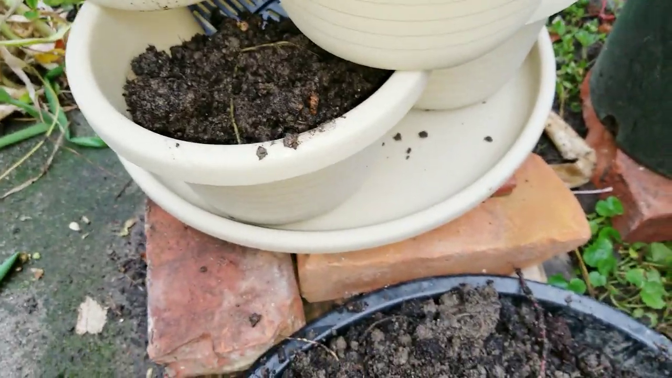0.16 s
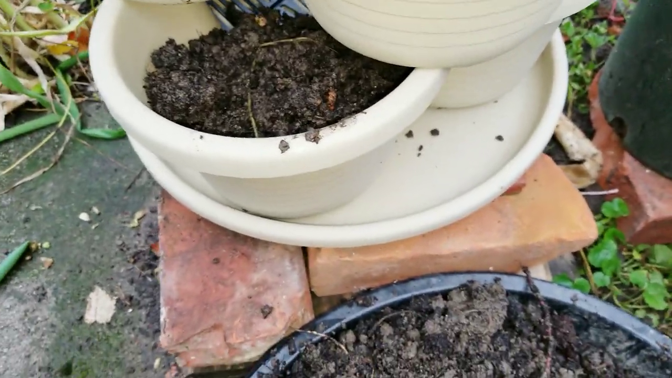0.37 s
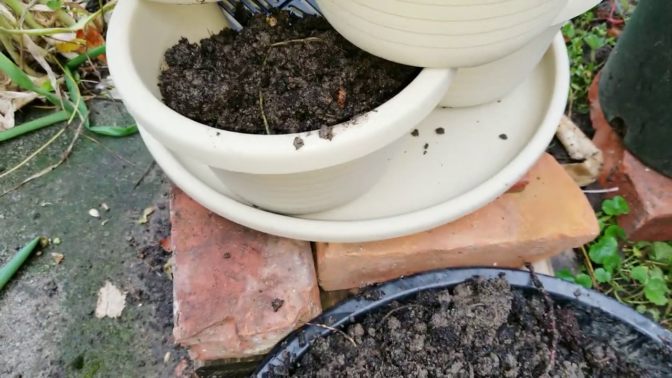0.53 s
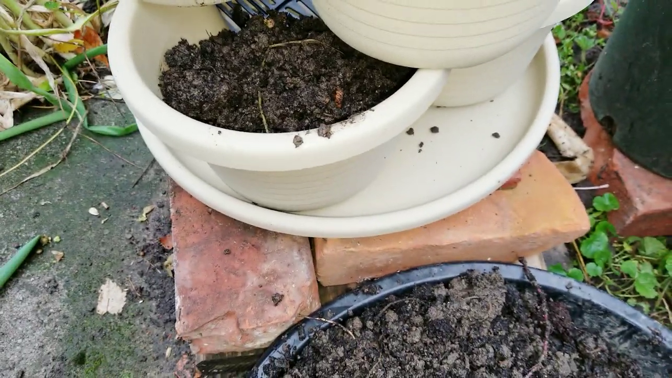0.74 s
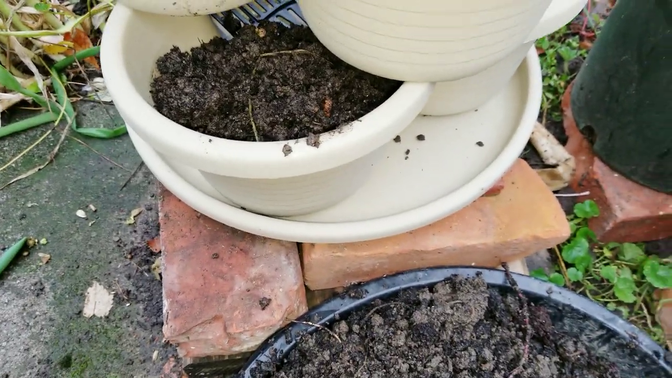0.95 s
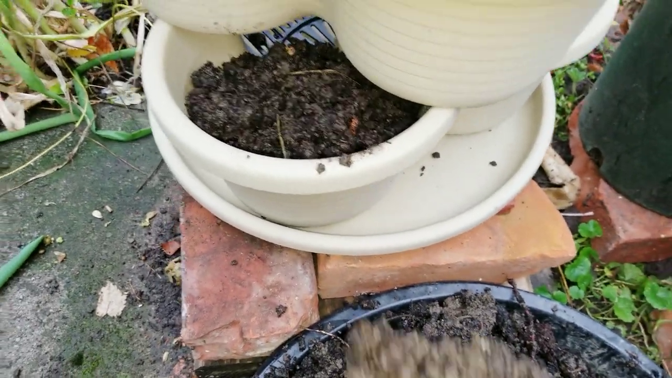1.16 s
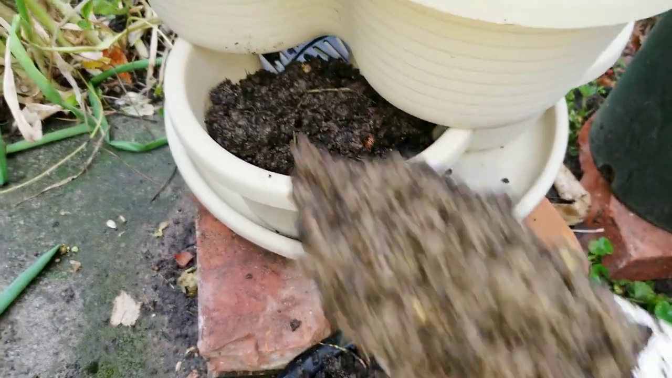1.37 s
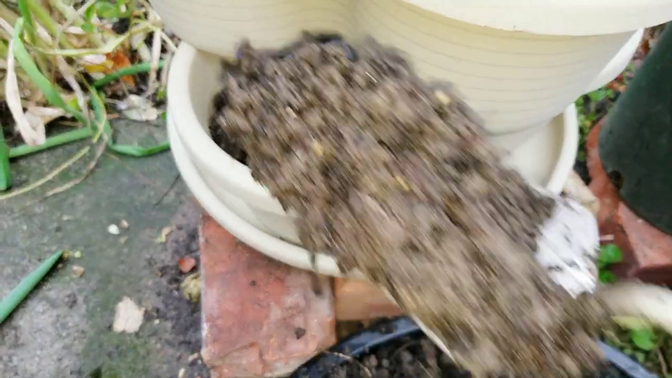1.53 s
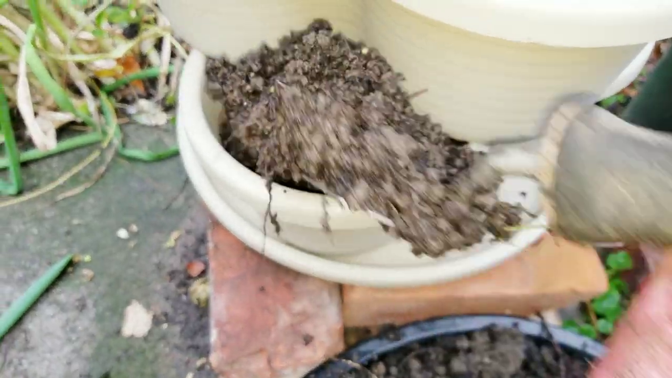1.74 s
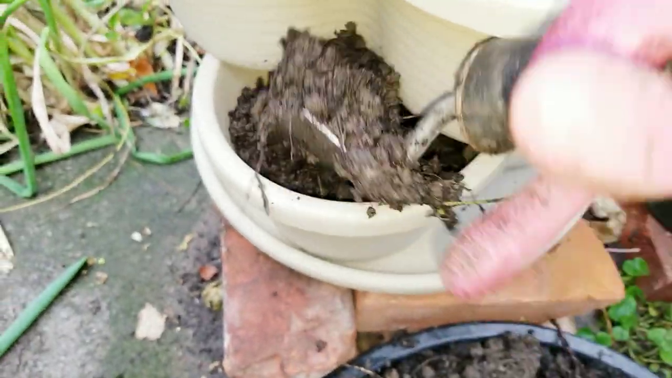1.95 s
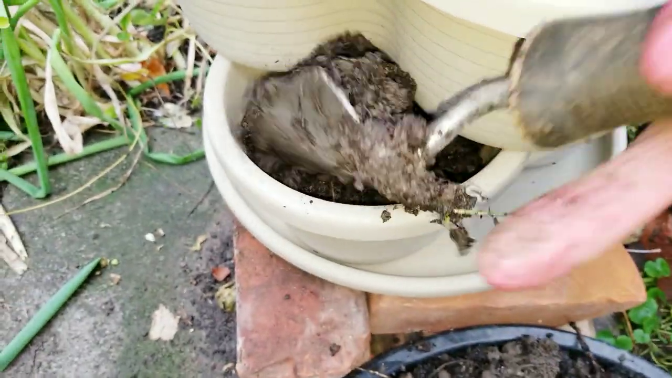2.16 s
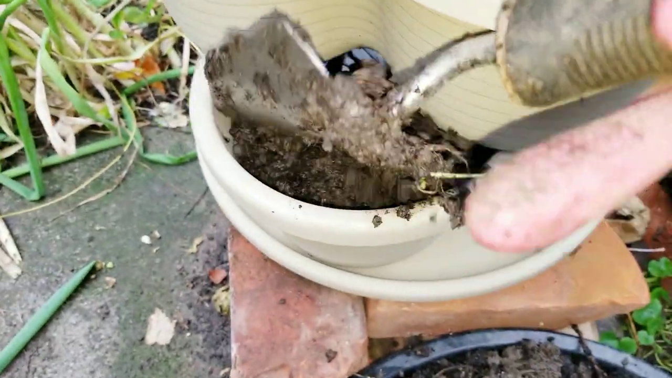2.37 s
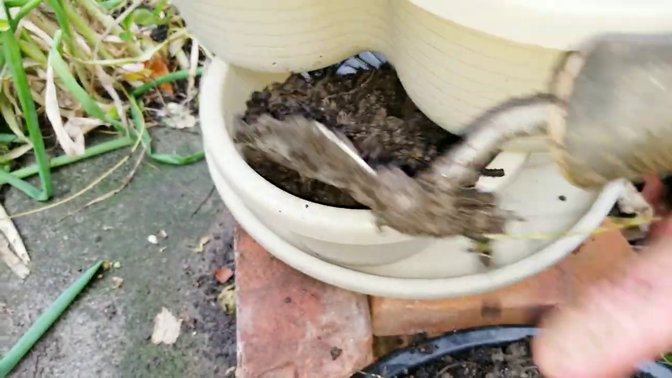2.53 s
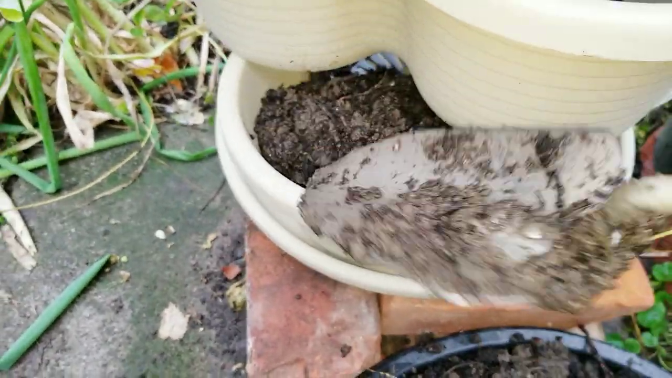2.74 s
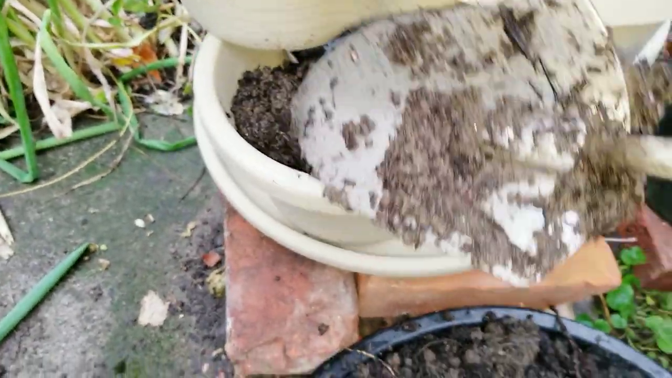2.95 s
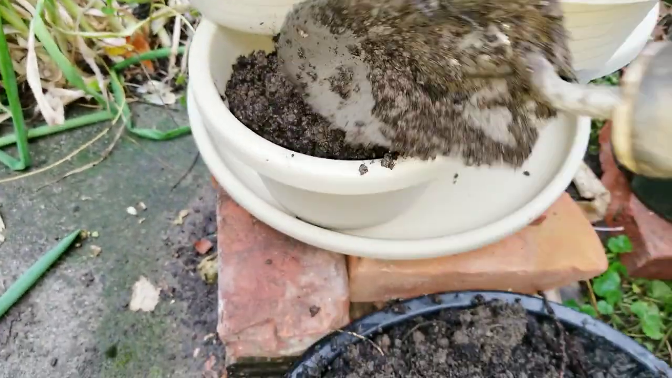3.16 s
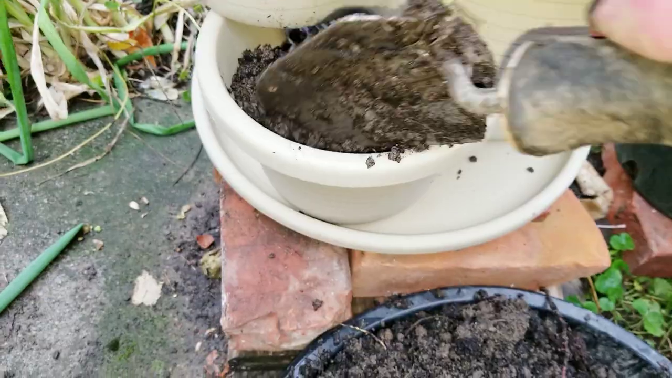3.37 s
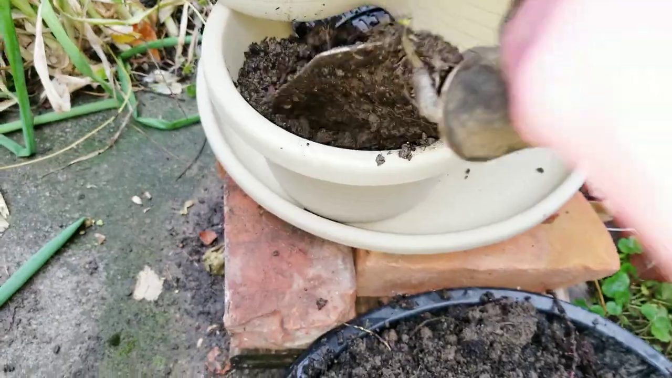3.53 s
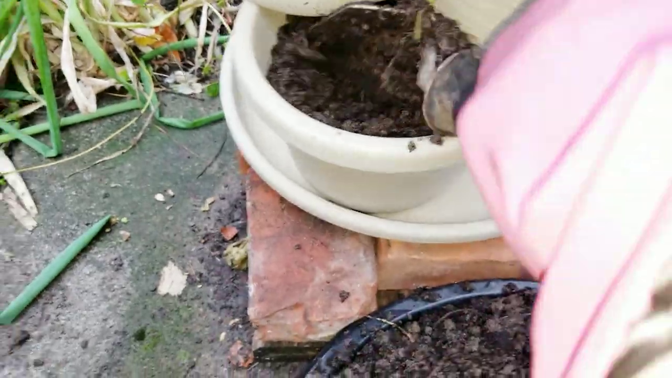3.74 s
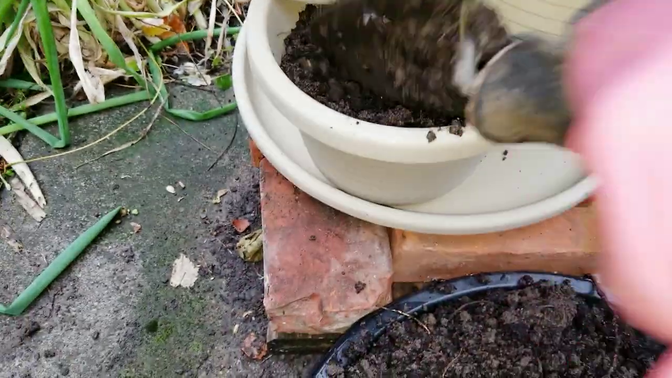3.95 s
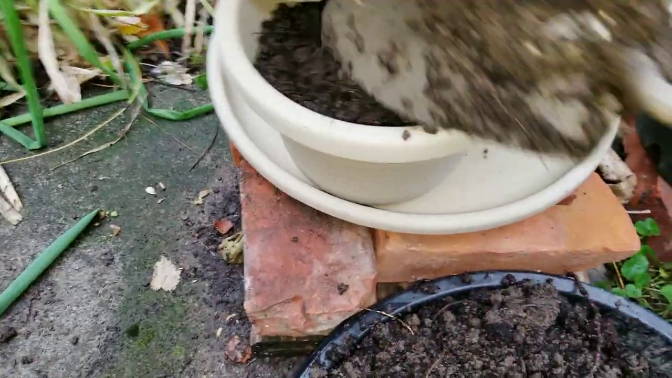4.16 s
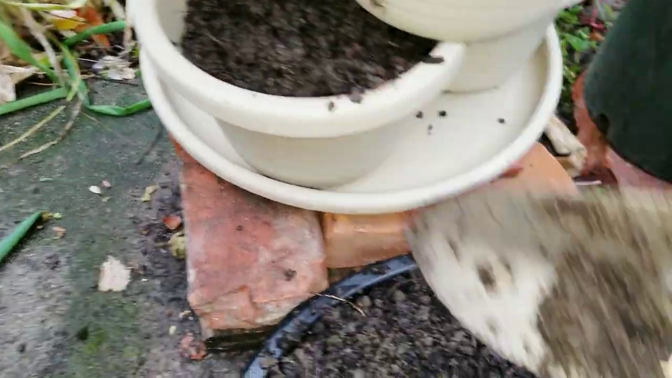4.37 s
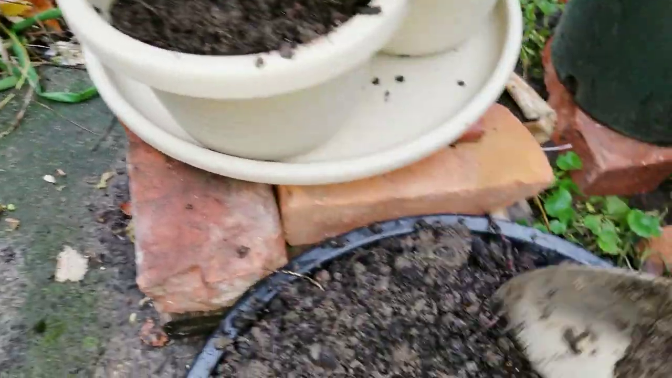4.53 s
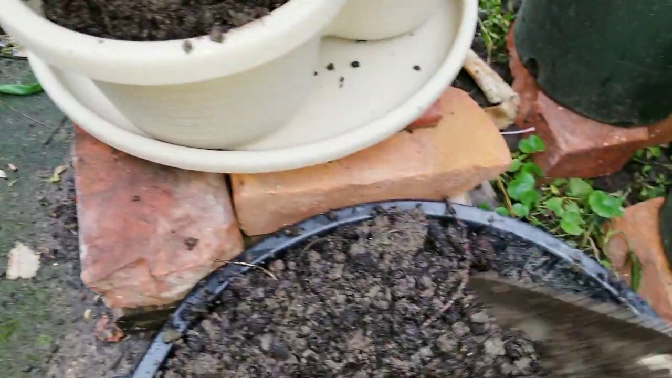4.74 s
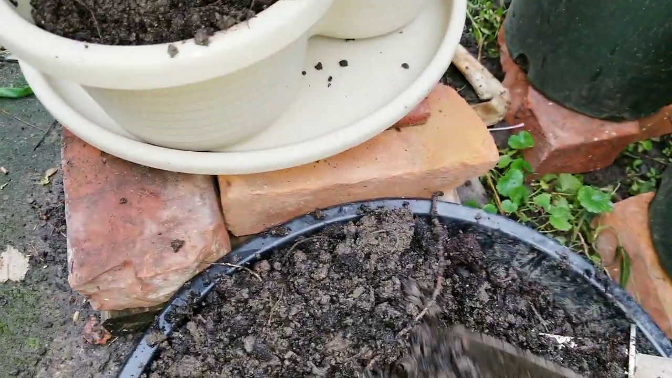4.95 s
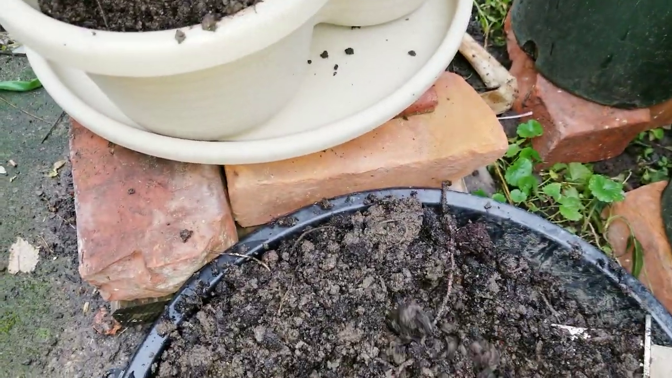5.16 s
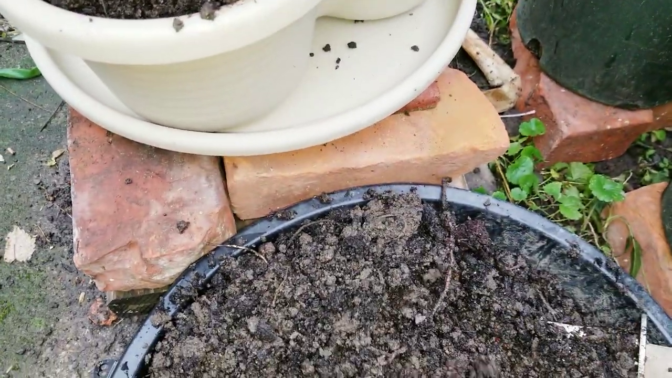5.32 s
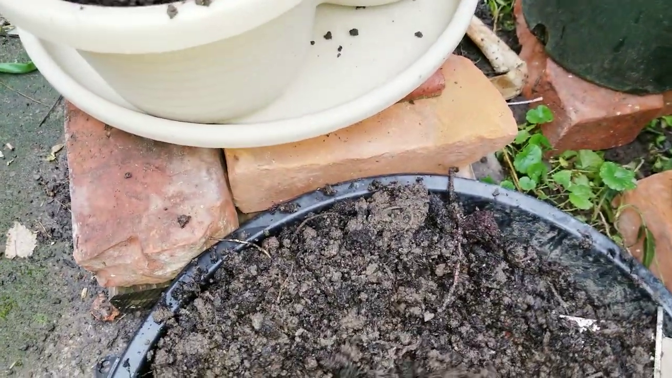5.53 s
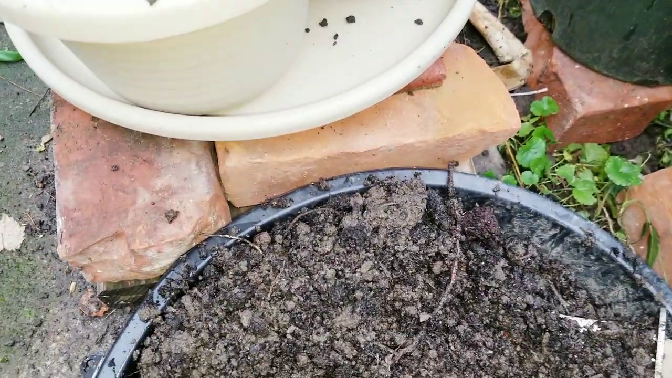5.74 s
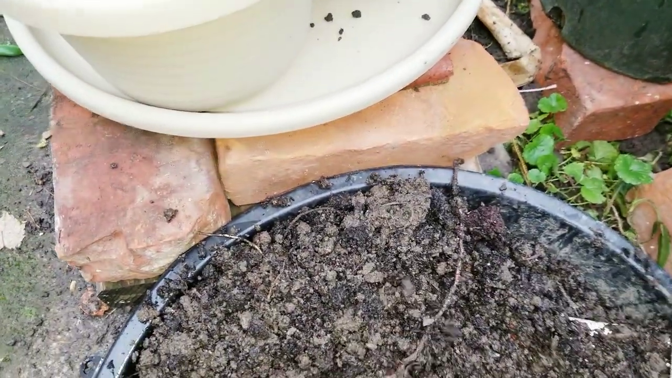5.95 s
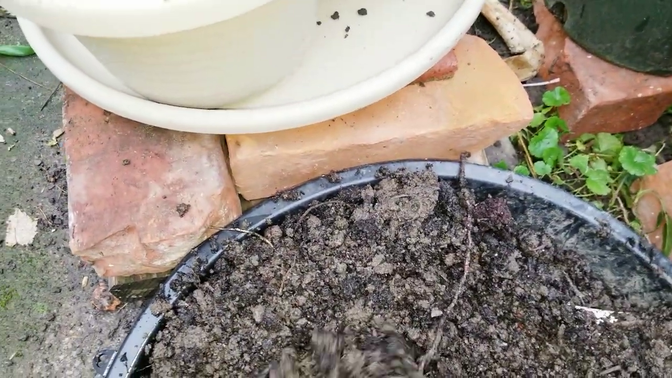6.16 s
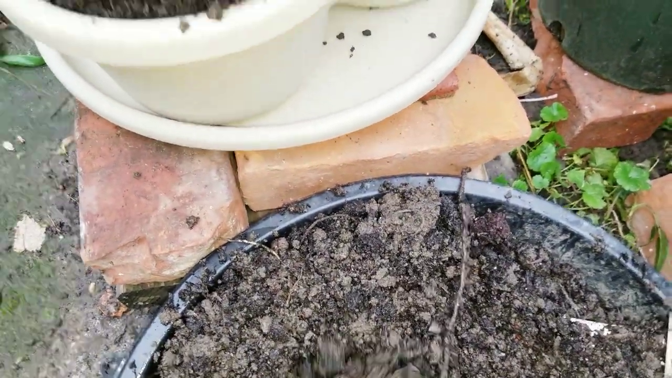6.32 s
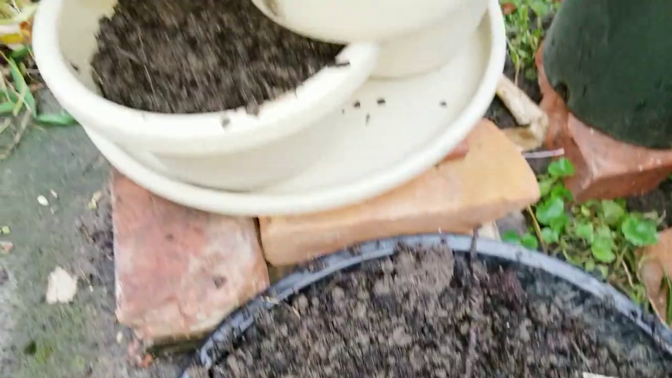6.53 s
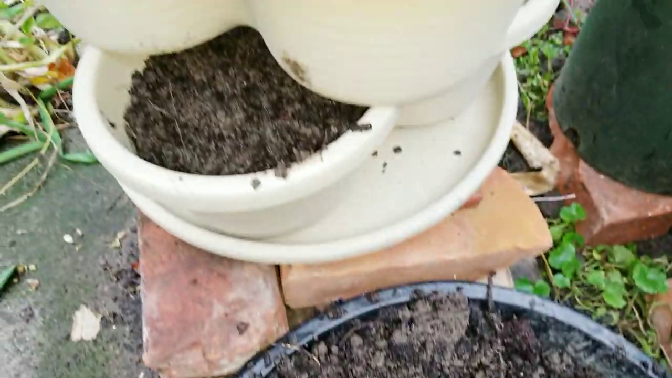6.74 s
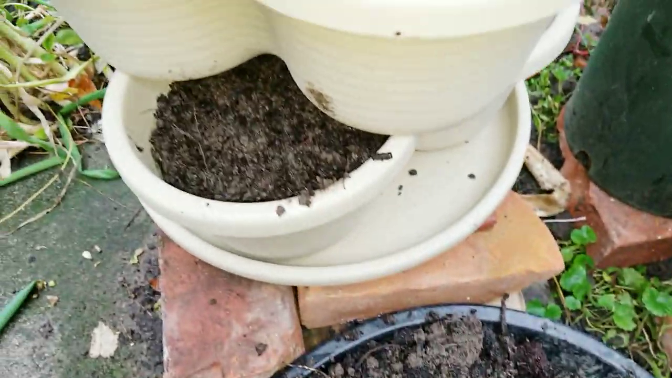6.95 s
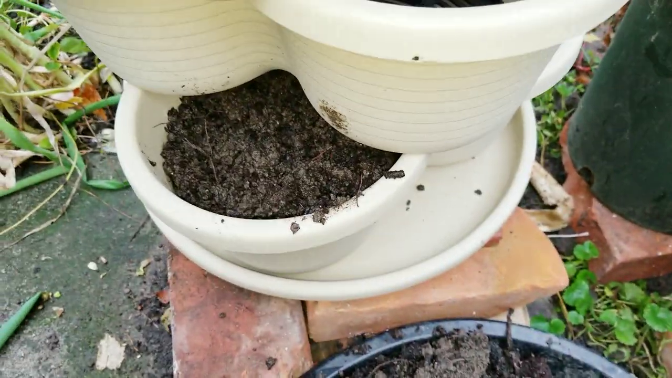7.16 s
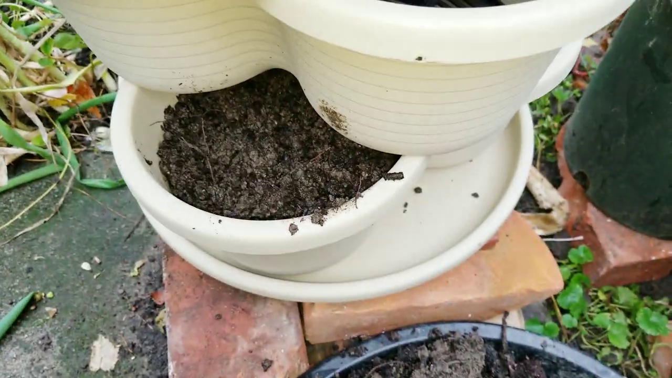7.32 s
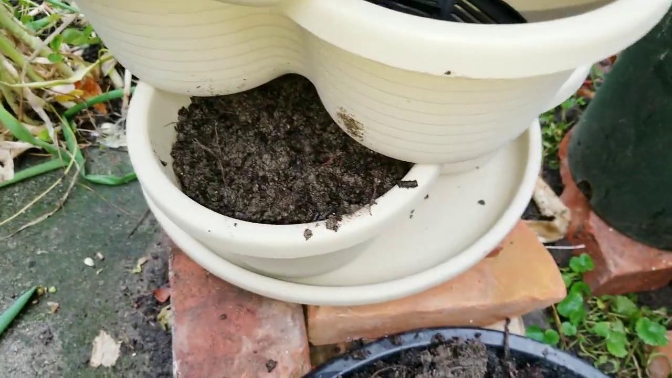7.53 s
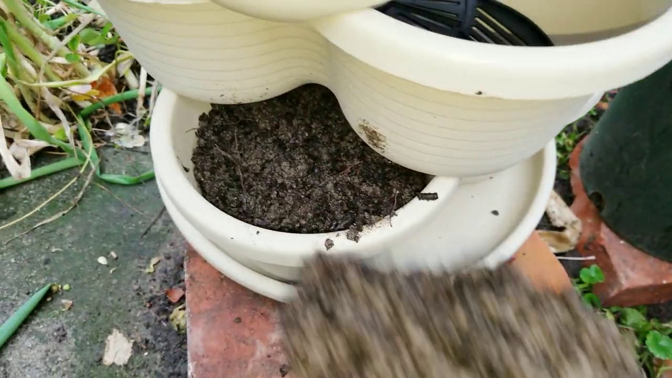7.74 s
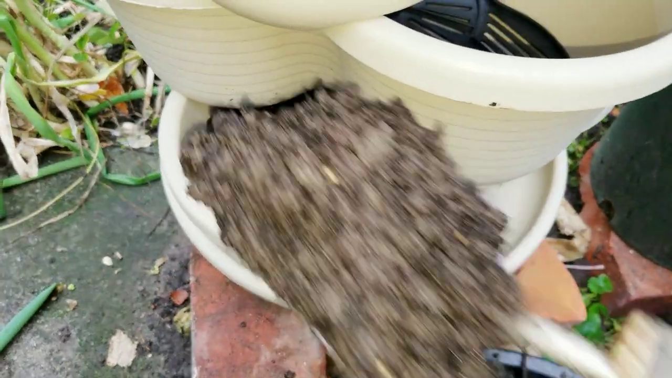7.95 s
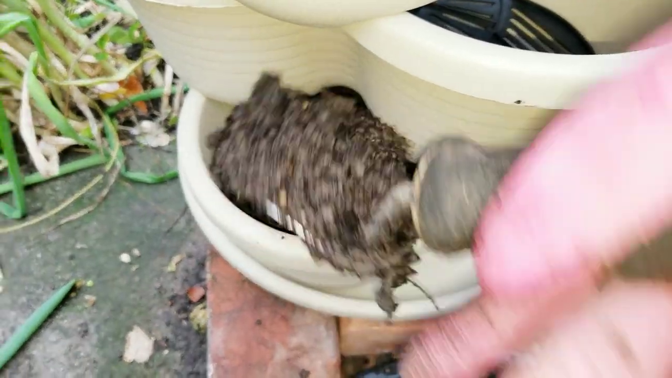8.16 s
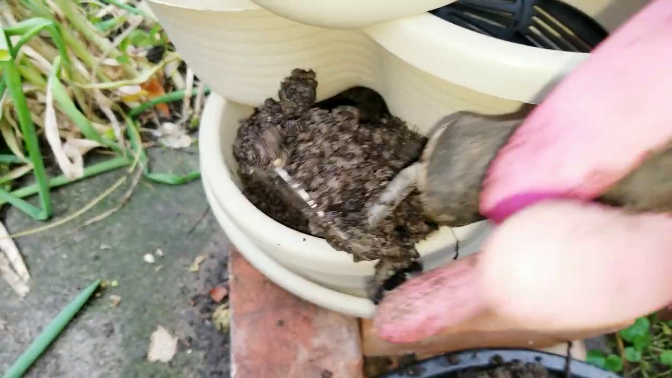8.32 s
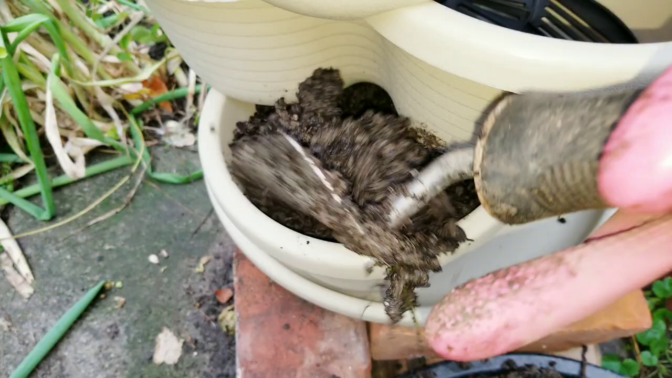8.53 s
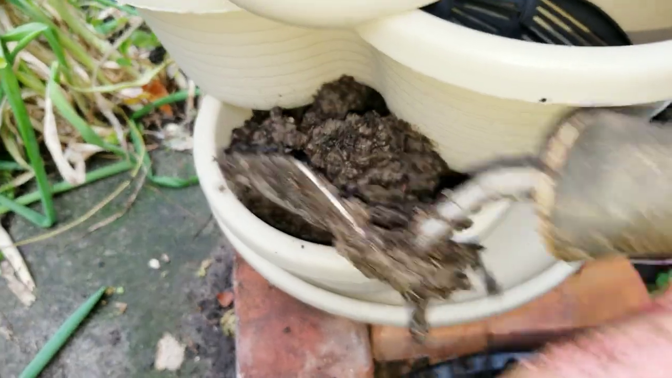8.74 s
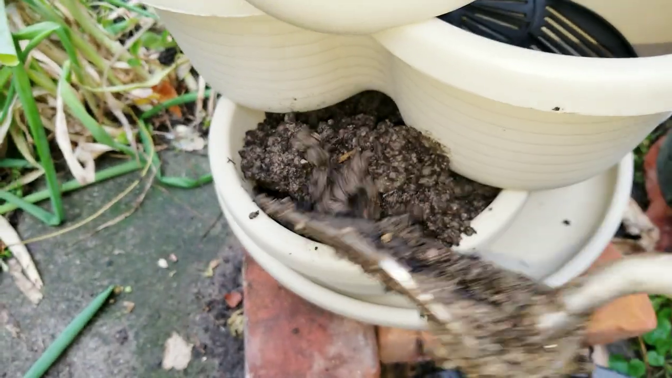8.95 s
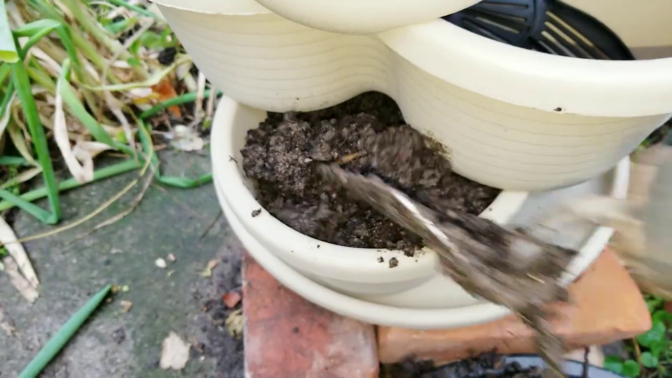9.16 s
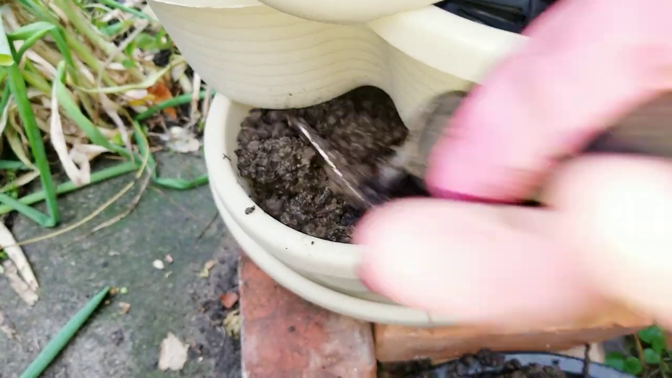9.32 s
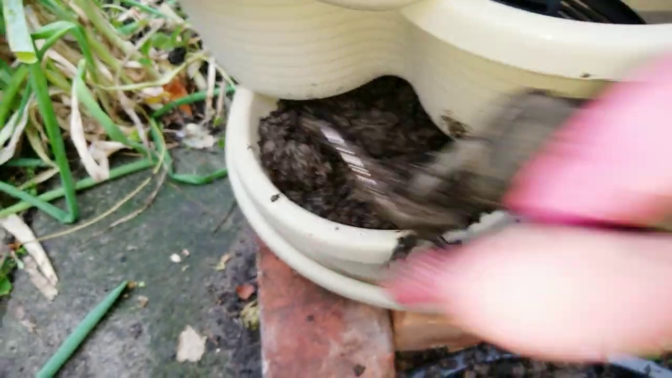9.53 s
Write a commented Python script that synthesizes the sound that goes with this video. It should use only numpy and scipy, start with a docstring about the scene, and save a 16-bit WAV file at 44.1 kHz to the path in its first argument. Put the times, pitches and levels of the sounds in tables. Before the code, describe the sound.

A metal trowel tips damp soil into a hollow plastic planter with knocks and gritty scrapes, digs again, then tips more, over faint outdoor rumble.

```python
"""Outdoors, a steel hand trowel digs damp soil from a tub, tips it into a plastic planter and pats it down.
Grit cracks excite the blade's soil-damped modes; blows of blade and clods excite the hollow planter wall.
Sliding soil and short drags are ragged noise forces through the same two bodies; small hard clicks ring
three modes of their own. Far traffic rumbles under the faint hiss of two microphones a few centimetres apart."""
import sys
import numpy as np
from scipy import signal
from scipy.fft import rfft, irfft, next_fast_len
from scipy.io import wavfile
from scipy.ndimage import uniform_filter1d, map_coordinates

SR = 44100
rng = np.random.default_rng(int(sys.argv[2]) if len(sys.argv) > 2 else 0)


def store_wav(level_fs):
    """Save 16-bit WAV to argv[1]."""
    pcm = np.round(np.clip(np.atleast_2d(level_fs), -1, 1) * 32767)
    wavfile.write(sys.argv[1], SR, pcm.T.astype(np.int16))


N = 427329

# modes of the soil-damped steel blade: (frequency [Hz], width [Hz], relative level [dB])
BLADE = [(1234, 1300, -16.5), (1680, 535, 4), (2314, 1340, -4), (2780, 330, 2.5), (3600, 610, -12),
         (4460, 430, 3), (5480, 1630, -3.5), (6530, 1200, 4), (8050, 1100, -1), (10160, 1300, 2.5),
         (12560, 1930, -1), (15100, 1450, 4)]
# where the trowel works: (time [s], lag of left behind right [s], left-right level [dB])
PLACE = [(0, 0.000049, 0), (2.2, 0.000075, 1.5), (4.4, 0.00011, 1.5), (4.6, 0.00023, -1.5),
         (6.1, 0.00016, -5.5), (7.4, 0.000062, -4), (8.6, 0.000085, 1.5), (9.69, 0.00012, -1.5)]
BODY_HZ, TREBLE_HZ = 2810, 8500  # where the grit's three colours meet


def amp(db):
    """Level in decibels to amplitude ratio."""
    return 10 ** (np.asarray(db) / 20)


def unit(x):
    """Normalisation to an rms of 1."""
    return x / np.sqrt(np.mean(x ** 2) + 1e-20)


def along(points, hz):
    """Linear interpolation of (frequency [Hz], value) points on a logarithmic frequency axis."""
    f, value = np.transpose(points)
    return np.interp(np.log(hz + 1), np.log(f + 1), value)


def curves(rows):
    """Linear interpolation in time: one value per sample for each column after the time."""
    s, *columns = np.transpose(rows)
    return [np.interp(np.arange(N) / SR, s, column) for column in columns]


def wobble(rate):
    """Band-limited random fluctuation: a smooth curve through random knots, rate of them a second."""
    knots = rng.standard_normal(int(N * rate / SR) + 4)
    return map_coordinates(knots, [np.arange(N) * rate / SR])


def filtered(x, response):
    """Linear filtering: the spectrum of x times a complex response of frequency."""
    m = next_fast_len(N + SR // 2)
    hz = np.fft.rfftfreq(m, 1 / SR)
    return irfft(rfft(x, m) * response(hz), m)[..., :N]


def coloured(x, gain):
    """Power-preserving filtering: the response is scaled so that white noise keeps its power."""
    return filtered(x, lambda hz: gain(hz) / np.sqrt(np.mean(np.abs(gain(hz)) ** 2)))


def pair(n, shared):
    """Partial coherence: noise at two microphones, a share of its power common to both."""
    noise, shared = rng.standard_normal((3, n)), np.clip(shared, 0, 1)
    return np.sqrt(shared) * noise[0] + np.sqrt(1 - shared) * noise[1:]


def left_right(pan):
    """Level difference between the microphones [dB], split evenly between left and right."""
    return np.array([[pan / 2], [-pan / 2]])


def pan_at(s):
    """Level difference [dB] due to the trowel's place at these times."""
    t, _, pan = np.transpose(PLACE)
    return np.interp(s, t, pan)


def modes(table, hz):
    """Modal superposition: a body's response to a force as a sum of resonances of alternating sign."""
    return sum((-1) ** k * amp(db) * 1j * hz * width / (centre * centre - hz * hz + 1j * hz * width)
               for k, (centre, width, db) in enumerate(table))


def bursts(times, dbs, pans, holds, t60s, rise, snap, shared):
    """Contact forces: noise that rises, holds and decays, with a single push of size snap at each start."""
    out, t = np.zeros((2, N + SR)), np.arange(SR // 5) / SR
    for s, db, pan, hold, t60, up in np.broadcast(times, dbs, pans, holds, t60s, rise):
        decay = amp(-60 * np.maximum(t - hold, 0) / np.clip(t60, .004, .2))
        envelope = decay * (1 - np.exp(-t / up))
        push = snap * rng.choice([-1, 1]) * np.exp(-t / up)
        force = envelope * pair(len(t), shared) + push
        out[:, round(s * SR):][:, :len(t)] += amp(db + left_right(pan)) * force
    return out[:, :N]


def notes(times, dbs, pans, t60s, pitches):
    """Free damped vibration: one decaying sine per contact, at the pitch given for it."""
    out, t = np.zeros((2, N + SR)), np.arange(SR // 10) / SR
    for s, db, pan, t60, hz in np.broadcast(times, dbs, pans, t60s, pitches):
        envelope = amp(db + left_right(pan) - 60 * t / t60)
        out[:, round(s * SR):][:, :len(t)] += envelope * np.sin(2 * np.pi * hz * t)
    return out[:, :N]


def clumps(slow_db, fast_db):
    """Stick-slip granular flow: soil slips in lumps and grains, a ragged gain of rms 1."""
    return unit(amp(slow_db * wobble(60) + fast_db * wobble(450)))


def planter(hz):
    """Modal response of the hollow plastic wall; a small pot is an inefficient radiator of bass."""
    # wall modes: (frequency [Hz], width [Hz], relative level [dB])
    wall_modes = [(135, 52, 1), (342.7, 11.5, -1.5), (412.5, 62, -1), (662, 86, -0.5), (767.5, 87, 2),
                  (1084, 444, -3.5), (1286, 230, -4), (1665, 310, -15), (2250, 2650, -25), (3340, 810, -19)]
    radiation = (1j * hz / 200 / (1 + 1j * hz / 200)) ** 2
    return modes(wall_modes, hz) * radiation


def grit(force, body_db, treble_db):
    """Size-dependent excitation: big crumbs ring the blade's low modes, hard sand its high ones.

    force(dB) makes the excitation of each colour."""
    def low(hz):
        return 1 / np.sqrt(1 + (hz / BODY_HZ) ** 6) / np.sqrt(1 + (1100 / (hz + 1)) ** 6)

    def high(hz):
        return 1 / np.sqrt(1 + (TREBLE_HZ / (hz + 1)) ** 6)

    def mid(hz):
        return np.sqrt(1 - high(hz) ** 2) / np.sqrt(1 + (BODY_HZ / (hz + 1)) ** 6)

    # a flat part 7 dB down adds to the modes
    return sum(coloured(force(db), lambda hz: (modes(BLADE, hz) + amp(-7)) * band(hz))
               for db, band in [(body_db, low), (0, mid), (treble_db, high)])


def banded(x, depth_db):
    """Contact-dependent modal coupling: as the contact moves, different bands come forward for some 30 ms."""
    z = signal.stft(x, nperseg=256)[2]
    field = rng.standard_normal(z.shape[1:])
    field = uniform_filter1d(uniform_filter1d(field, size=3, axis=0), size=10, axis=1)
    gain = unit(amp(depth_db * unit(field)))
    return signal.istft(z * gain, nperseg=256)[1][:, :N]


def town():
    """Partial coherence: traffic rumble and moving air partly alike on both sides, and microphone hiss."""
    # course of the rumble: (time [s], level before a common gain [dB], left-right level [dB])
    course = [(0.0, -48.5, 0), (1.86, -49, -1), (2.29, -47.5, -1.5), (3.34, -49, 0), (3.72, -48, -3),
              (4.1, -50, -0.5), (5.99, -48.5, 0), (6.83, -45.5, 2.5), (7.23, -49, -0.5), (8.72, -46.5, -1),
              (9.07, -46.5, 0.5), (9.69, -49, -1.5)]
    # rumble spectrum: (frequency [Hz], relative density [dB per Hz])
    rumble_spectrum = [(12, -47), (20, -31), (30, -15), (48, 1), (121, -5.5), (281, -17), (330, -19.5),
                       (363, -23), (532, -34), (644, -39), (900, -35.5), (1170, -47), (1980, -120)]
    # hiss spectrum: (frequency [Hz], relative density [dB per Hz])
    hiss_spectrum = [(290, -7), (500, -4), (538, -2.5), (651, -8.5), (1130, -11), (1680, -14), (2610, -13),
                     (3210, -22), (3770, -18.5), (8930, -25), (15100, -16.5), (15800, -35), (16500, -25)]
    # likeness of the two sides: (frequency [Hz], correlation [-1 to 1])
    likeness = [(30, .7), (80, .75), (160, .85), (320, .65), (640, .2)]

    def mid_side(hz):
        turn = np.arccos(np.clip(along(likeness, hz), -1, 1)) / 2  # mid less side power is the correlation
        return amp(along(rumble_spectrum, hz)) * [np.cos(turn), np.sin(turn)]

    rumble_db, pan = curves(course)
    mid, side = filtered(rng.standard_normal((2, N)), mid_side)
    level_db = rumble_db + 1.68 + 0.3 * wobble(3.27) + np.array([pan, -pan]) / 2
    rumble = amp(level_db) * unit(np.array([mid + side, mid - side]))
    hiss = unit(filtered(rng.standard_normal((2, N)), lambda hz: amp(along(hiss_spectrum, hz))))
    return rumble + amp(-60 + 0.31 * wobble(3.41)) * hiss


def ticks():
    """Impulse response of a small hard body that clicks beside the tub: a dry push and a few short modes."""
    # clicks: (time [s], nominal peak level [dB])
    clicks = [(0.034, -48), (0.109, -46), (0.2147, -45.5), (0.2545, -46), (0.267, -41), (0.334, -45.5),
              (0.4389, -27.5)]
    # modes of the clicking body: (frequency [Hz], width [Hz], relative level [dB])
    tick_modes = [(1700, 230, -0.5), (2800, 240, -2.5), (4360, 490, -12.5)]
    pan_db, ring_db = -4.5, -9.5  # left-right level; free ringing under a click's peak
    s, db = np.transpose(clicks)
    ring = sum(notes(s, db + ring_db + mode_db, pan_db, np.log(1000) / (np.pi * width), centre)
               for centre, width, mode_db in tick_modes)
    push = bursts(s, db, pan_db, 0, 0.01, rise=0.00014, snap=0.72, shared=0.36)
    return ring + coloured(push, lambda hz: modes(tick_modes, hz))


def rolling():
    """Granular flow in spells: grit and wall level of the loose crumbs, at -110 dB between spans."""
    # spans of rolling crumbs, each a list of (time [s], grit level [dB], planter wall level [dB])
    spans = [
        [(0.0, -60.5, -62.5), (0.5, -103, -71)],
        [(1.55, -73.5, -77), (1.8, -65, -56), (1.938, -60, -51.5), (2.196, -61.5, -63), (2.34, -57, -52.5),
         (2.884, -63, -60), (3.1, -71, -71)],
        [(3.25, -67, -69), (3.428, -59, -53), (3.562, -45.5, -74), (3.752, -61.5, -45), (4.4, -75.5, -66)],
        [(4.6, -75, -73), (5.134, -61, -79), (5.218, -47.5, -68), (5.33, -59.5, -64), (5.468, -63.5, -67.5),
         (6.1, -75, -73)],
        [(7.4, -74.5, -70), (7.8, -71, -72), (8.09, -64.5, -59.5), (8.29, -63.5, -60.5), (8.48, -61.5, -55),
         (8.62, -67, -55), (8.67, -54, -53), (9.01, -68, -55), (9.2, -51.5, -58), (9.49, -61, -62),
         (9.69, -67, -67)],
    ]
    rows = []
    for span in spans:
        before, after = span[0][0] - .05, span[-1][0] + 0.079
        rows += [[before, -110, -110], *span, [after, -110, -110]]
    return curves(rows)


def slide():
    """Distributed random impacts: loose crumbs hiss as they roll and their weight drums on the wall."""
    grit_db, wall_db = rolling()
    grain, sides = clumps(3.1, 0.74), amp(left_right(-3.5))
    # coarse soil loads the wall and the blade's low modes alike, and has less treble
    coarse_db = wall_db - grit_db
    body_db = 1 + 0.45 * coarse_db
    treble_db = -1 - 0.19 * np.maximum(coarse_db, 0)
    hiss = grit(lambda colour_db: amp(grit_db + colour_db) * sides * grain * pair(N, 0.31), body_db, treble_db)
    lumps = clumps(2, 2)
    return hiss + coloured(amp(wall_db) * lumps * pair(N, 0.58), planter)


def rubs():
    """Sliding friction: the blade drags on the rim and stops short; in the tub's loose soil it is softer-edged."""
    # short drags: (time [s], nominal blade peak [dB], nominal wall peak [dB], length [s])
    drags = [(1.844, -41, -54, 0.05), (2.199, -35, -31, 0.021), (2.314, -30, -21.5, 0.03),
             (2.472, -28.5, -28, 0.019), (3.335, -48, -35.5, 0.092), (3.518, -43, -21.5, 0.077),
             (3.577, -37.5, -20.5, 0.028), (3.615, -38, -36.5, 0.06), (3.658, -30.5, -28, 0.119),
             (3.718, -26, -21.5, 0.014), (3.932, -43, -19.5, 0.029), (4.146, -53, -47, 0.012),
             (4.71, -40.5, -73, 0.054), (4.739, -28.5, -68, 0.046), (5.055, -44.5, -66, 0.028),
             (5.128, -48, -83, 0.037), (5.208, -22.5, -77, 0.0081), (5.237, -40, -52, 0.1),
             (5.567, -41.5, -53, 0.1), (5.718, -49, -64, 0.054), (5.864, -60, -56, 0.034),
             (5.904, -48.5, -55, 0.042), (8.079, -35, -33, .006), (8.093, -29.5, -32, 0.02),
             (8.119, -28.5, -24.5, 0.023), (8.185, -46, -41, .045), (8.496, -32.5, -34, 0.01),
             (8.543, -42, -28, 0.032), (8.677, -36, -32, 0.017), (9.141, -41.5, -49, 0.039),
             (9.177, -29.5, -66, 0.013)]
    # digging in the tub: (start [s], end [s])
    digging = (4.5, 6.2)
    s, db, wall_db, hold = np.transpose(drags)
    loose = (s > digging[0]) & (s < digging[1])
    rise, fade = np.where(loose, .006, .002), np.where(loose, .09, .035)  # s
    # coarse soil loads wall and low modes alike; the tub's damp soil has less treble
    body_db = np.where(loose, 8, 1.5) + 0.52 * (wall_db - db)
    treble_db = np.where(loose, -7, 0)
    blade_db, under_wall_db = -10, -8.5  # steady force under the peak, on blade and wall
    grain = clumps(2.1, 1.9)

    def drag(colour_db):
        level_db = db + blade_db + colour_db
        return grain * bursts(s, level_db, pan_at(s), hold, fade, rise, snap=0, shared=0.12)

    hiss = grit(drag, body_db, treble_db)
    lumps = clumps(1.5, 2.5)
    load = bursts(s, wall_db + under_wall_db, 0, hold, 0.062, rise=0.0023, snap=0, shared=0.85)
    return hiss + coloured(lumps * load, planter)


def strays(count):
    """Random point process: single grains drop out of the rolling crumbs, more often where these are loud.

    The rows have the columns of the grit cracks."""
    grit_db = rolling()[0]
    when, size, body, treble = rng.random((count, 4)).T
    busy = np.cumsum(amp(grit_db / 2))
    at = np.searchsorted(busy, when * busy[-1]).clip(0, N - 1)
    peak_db = grit_db[at] + 7 - 4 * np.log(1 - size)  # an exponential spread of levels
    return np.transpose([at / SR, peak_db, 20 * body - 10, -20 * treble])


def cracks():
    """Impact excitation: each stone on steel or plastic gives a snap, a short puff and a brief blade note."""
    # grit cracks: (time [s], nominal peak level [dB], relative body level [dB], relative treble level [dB])
    hits = [(0.4384, -30.5, -4, 2.5), (1.8522, -34, 2, -8), (1.9036, -33, 5, 11.5), (2.2057, -23.5, 2.5, 9),
            (2.2354, -38, 15.5, -11), (2.3123, -25, 3, -17), (2.372, -44, 15, -11), (2.473, -23, -21, -6),
            (2.4785, -16.5, -16, -2), (2.555, -49, -4, 17), (2.735, -48, 4, -15), (2.7521, -34.5, -21, -19),
            (2.813, -38, -4, 3), (2.837, -45, 4, -20), (2.853, -41, -10, -10), (2.8674, -32, -18, 6.5),
            (3.5176, -33, 8.5, -9), (3.5767, -23, 3.5, -1), (3.6253, -31, -3, 2), (3.6575, -15, -6.5, 0.5),
            (3.715, -19.5, 0, 5), (3.761, -27.5, -8, 5), (3.8487, -49, 2, -9), (3.913, -29, -3, -10),
            (3.9347, -27.5, 7.5, -14), (4.073, -49, 6, -20), (4.122, -44, -4, -11), (4.134, -41, -4, -10),
            (4.1404, -38, -1, -22), (4.147, -39, 10.5, -17), (4.189, -46, -10, 3), (5.064, -41, -11, 7),
            (5.19, -29, -25, 1), (5.2145, -25.5, -28, -16), (5.295, -29, 7.5, 2),
            (5.3713, -46.5, 11.5, -13), (5.6052, -23, -8, -24), (5.7354, -39, -16, -13),
            (5.877, -52, 5, -20), (5.887, -48, 9, -15), (5.9, -53, 8, -20), (5.911, -49, 1, -13),
            (8.0858, -26, -9, -6), (8.1237, -19.5, 1, -19), (8.1713, -36, 7, -9), (8.1885, -35.5, 12, -10),
            (8.3655, -41.5, -13, 4), (8.437, -27.5, 0, -2), (8.442, -26.5, 2, 4), (8.4667, -33, 3, 3),
            (8.5051, -33, -1, -7.5), (8.546, -25, -2, -18), (8.6388, -14, -7, 7), (8.7182, -13, -3, -8.5),
            (8.8273, -32, 5.5, 2), (8.849, -36, 4, -16), (8.8932, -29.5, -7.5, -11),
            (8.9033, -31.5, -4, -7), (8.95, -38, -7, 0), (8.984, -48, 8, -10), (8.999, -28, -6.5, -3),
            (9.0333, -44, 2, 20), (9.047, -38.5, -11, 5), (9.0857, -43.5, -2, 8), (9.1611, -31, -16, -8),
            (9.3056, -46, 18, 1), (9.3325, -36, 3, 2), (9.6712, -43, 18.5, -21)]
    snap_db, puff_db, note_db = -8.5, -11.5, -8.5  # the three parts under a crack's peak
    small_stone_db = -12  # with less body than this a stone rings the blade's middle modes
    s, db, body_db, treble_db = np.vstack([hits, strays(count=70)]).T
    pan = pan_at(s)
    low = [centre for centre, _, _ in BLADE if 0 < centre < BODY_HZ]
    middle = [centre for centre, _, _ in BLADE if BODY_HZ < centre < TREBLE_HZ]
    pick = rng.random(len(s)) ** 2  # a random mode, favouring the lower ones of each group
    hz = np.array([(middle if body < small_stone_db else low)[int(p * len(low))]
                   for body, p in zip(body_db, pick)])
    harder_db = 0.13 * (db - db.mean())  # harder hits have more snap

    def strike(colour_db):
        snaps = bursts(s, db + snap_db + harder_db + colour_db, pan, 0, 0.0097,
                       rise=.0001, snap=1.16, shared=0.13)
        puffs = bursts(s, db + puff_db + colour_db, pan, 0, 0.034, rise=0.00028, snap=0, shared=0.11)
        return snaps + puffs

    ring_db = db + note_db + np.where(hz < BODY_HZ, body_db, 0)
    return grit(strike, body_db, treble_db) + notes(s, ring_db, pan, 0.0077, hz)


def knocks():
    """Contact stiffness sets bandwidth: a short push and ragged after-force, brighter blows reach upper modes."""
    # blows on the planter: (time [s], nominal peak level [dB], relative brightness [dB], note [Hz])
    blows = [(1.937, -40.5, 3, 791), (2.002, -30, -6.5, 860), (2.053, -29.5, -20, 660),
             (2.167, -29, -15, 746), (2.205, -7, -7, 628), (2.211, -13, -26, 425), (2.233, -13, -16, 488),
             (2.316, -12.5, -3, 820), (2.33, -12.5, -5, 647), (2.373, -11, -13.5, 458),
             (2.479, -18.5, -5, 810), (2.844, -33, -9, 434), (3.52, -2.5, -26, 442), (3.576, -17, -7, 760),
             (3.659, -10, -8.5, 645), (3.717, -6, -19, 1300), (3.748, -12.5, -21, 686),
             (3.859, -22, -25, 736), (3.911, -25, -15, 544), (3.932, -6, -8.5, 760),
             (4.126, -25.5, -26, 650), (4.201, -35.5, -17, 436), (4.274, -33, -24, 800),
             (8.095, -11.5, -7, 1110), (8.122, -18, -0.5, 1150), (8.188, -33, -12, 920),
             (8.323, -32, -21, 610), (8.438, -13, -8.5, 414), (8.477, -21, -2.5, 890),
             (8.546, -14.5, -5.5, 655), (8.638, -25.5, -11, 470), (8.679, -14.5, -4.5, 672),
             (8.716, -36, -29, 1480), (8.829, -12, -15, 884), (8.847, -36, -20, 353),
             (8.961, -27, -21, 467), (9.305, -40.5, 4, 1130), (9.669, -32, 6, 880)]
    soft_db, hard_db, note_db = -13.5, -5, -14  # the three parts under a blow's peak
    s, db, bright_db, hz = np.transpose(blows)
    t60 = 0.048 * (hz / 700) ** -0.45  # s; higher notes die sooner
    soft = bursts(s, db + soft_db, 0, 0, t60, rise=0.00082, snap=0.3, shared=0.75)
    hard = bursts(s, db + bright_db + hard_db, 0, 0, t60, rise=0.000091, snap=1.5, shared=0.89)
    # the two forces cross over at 900 Hz
    low_wall = coloured(soft, lambda f: planter(f) / (1 + 1j * f / 900) ** 2)
    high_wall = coloured(hard, lambda f: planter(f) * (1j * f / 900 / (1 + 1j * f / 900)) ** 2)
    return low_wall + high_wall + notes(s, db + note_db, 0, 1.2 * t60, hz)


def scene():
    """Arrival-time difference: the work lies nearer the right microphone, so the left hears it a little later."""
    soil = banded(slide() + rubs(), depth_db=2.6)
    left, right = soil + ticks() + cracks() + knocks()
    lag_s = curves(PLACE)[0]
    late = map_coordinates(left, [np.arange(N) - SR * lag_s], order=3)
    return np.array([late, right]) + town()


def record(dry):
    """Band limitation: an ideal low-pass keeps nothing from 15.9 kHz up."""
    return filtered(dry, lambda hz: hz < 15900)


dry = scene()
out = record(dry)
store_wav(out)
```